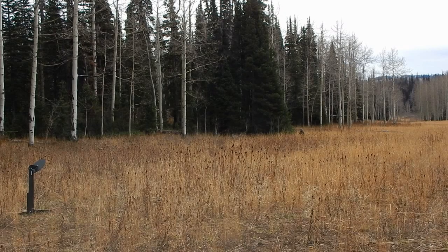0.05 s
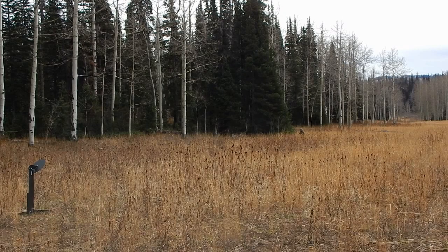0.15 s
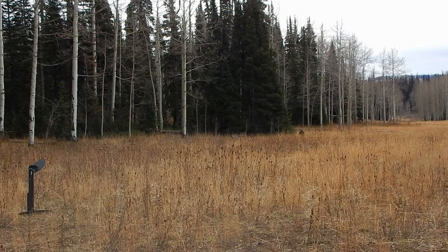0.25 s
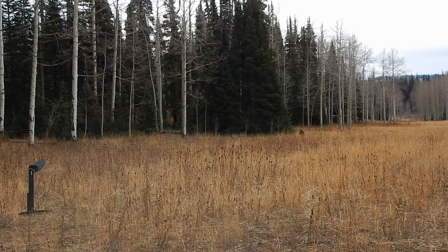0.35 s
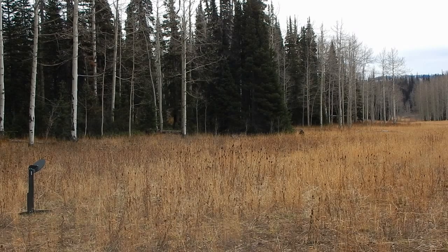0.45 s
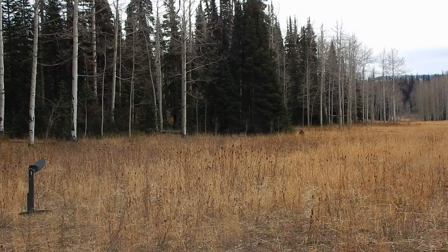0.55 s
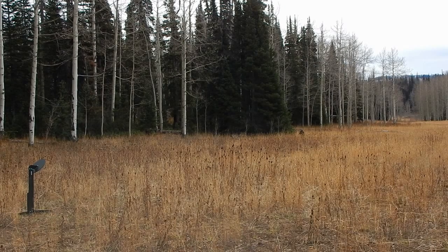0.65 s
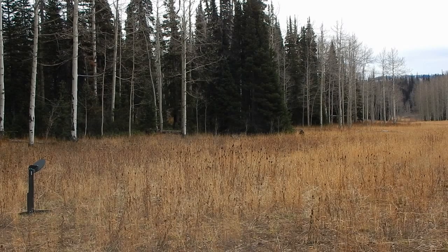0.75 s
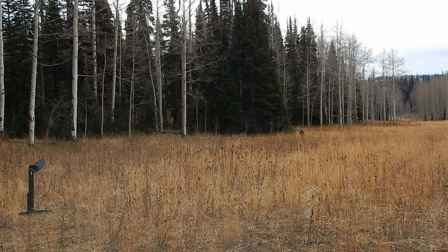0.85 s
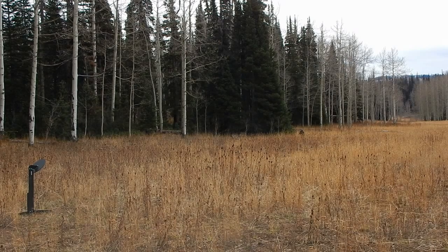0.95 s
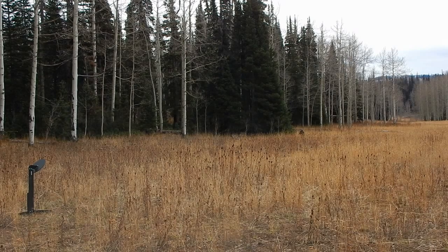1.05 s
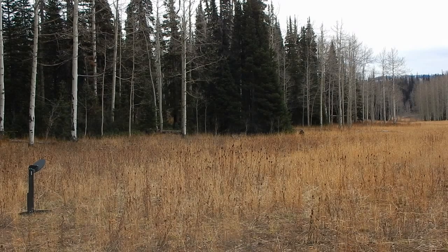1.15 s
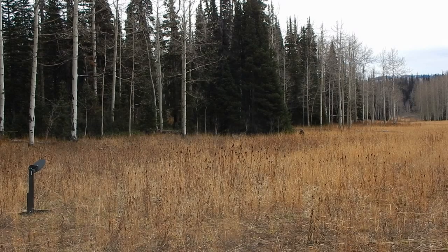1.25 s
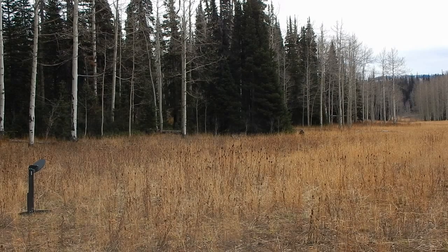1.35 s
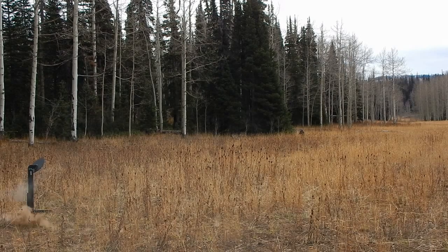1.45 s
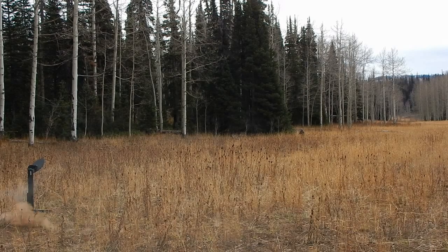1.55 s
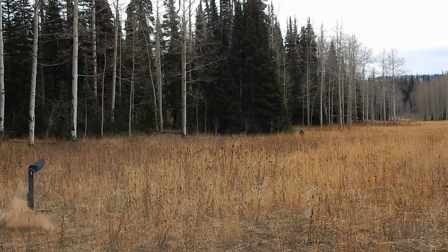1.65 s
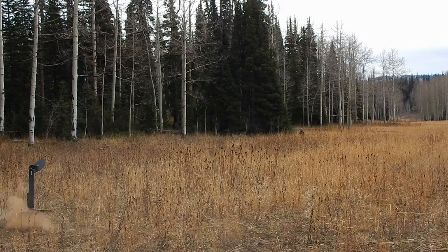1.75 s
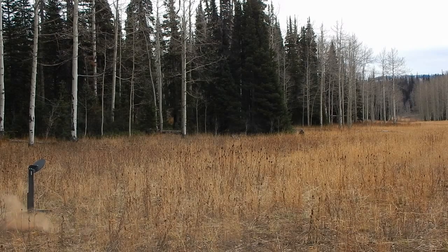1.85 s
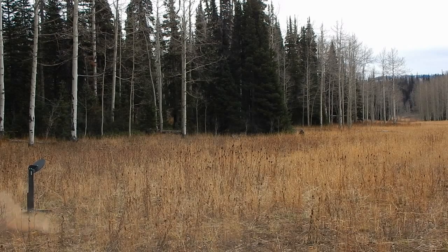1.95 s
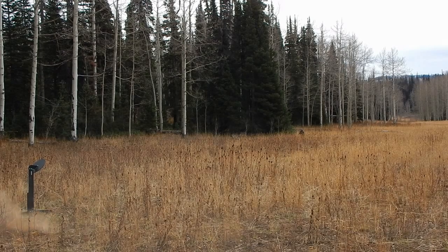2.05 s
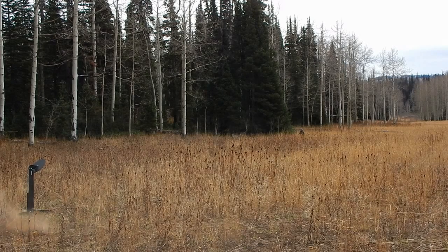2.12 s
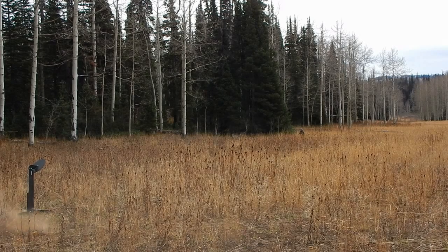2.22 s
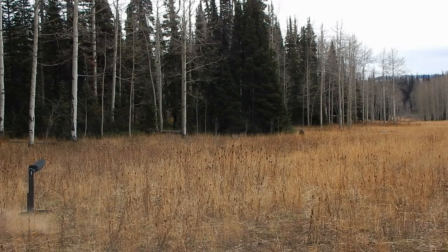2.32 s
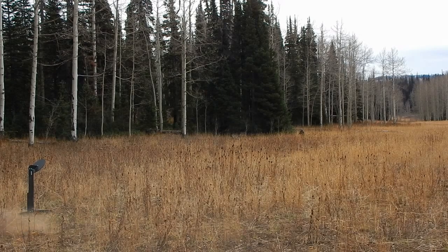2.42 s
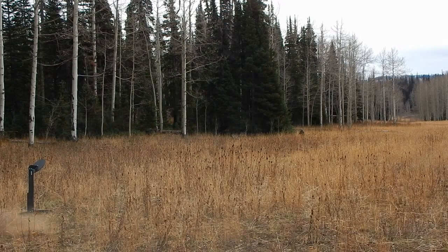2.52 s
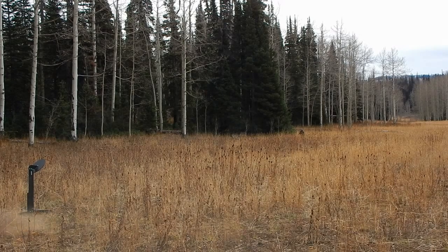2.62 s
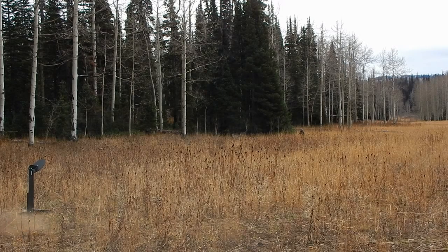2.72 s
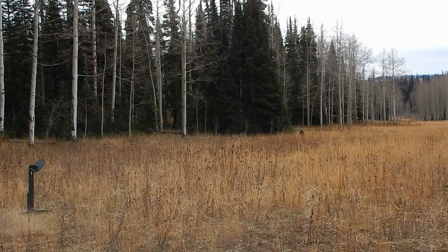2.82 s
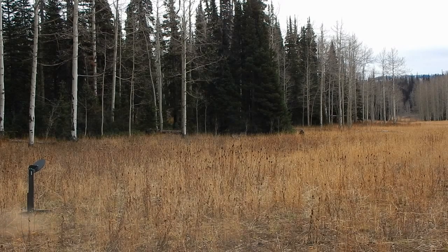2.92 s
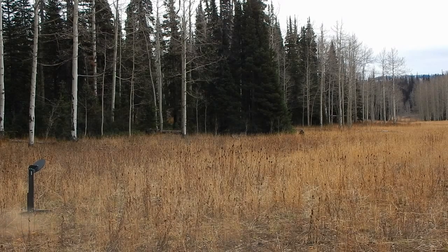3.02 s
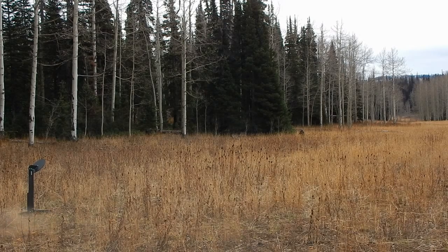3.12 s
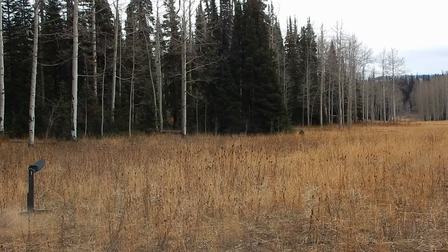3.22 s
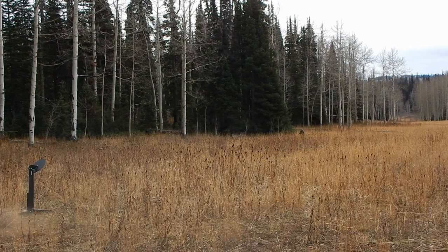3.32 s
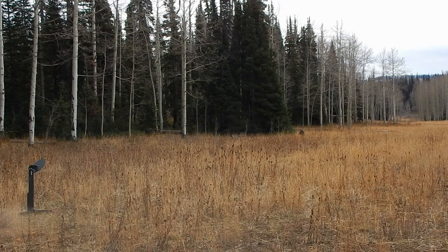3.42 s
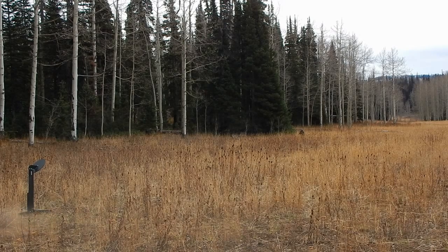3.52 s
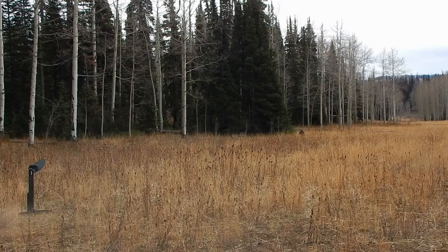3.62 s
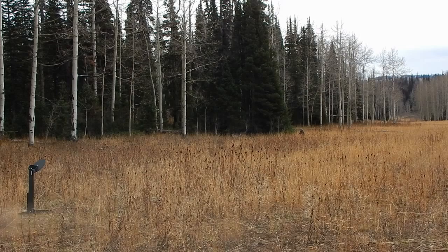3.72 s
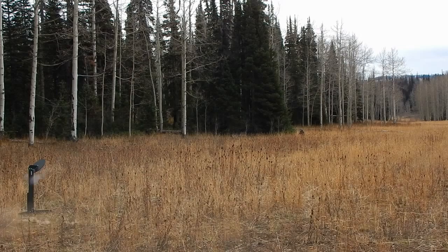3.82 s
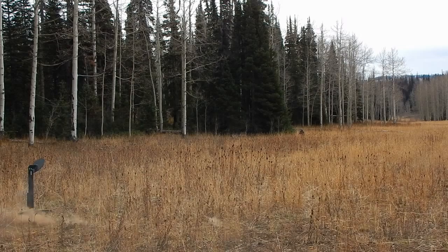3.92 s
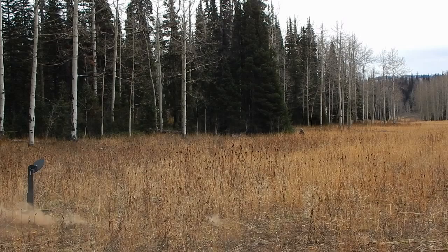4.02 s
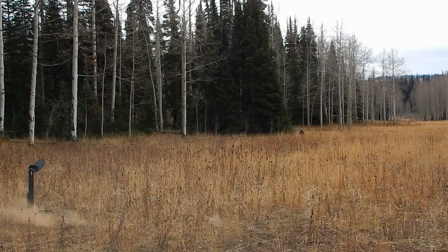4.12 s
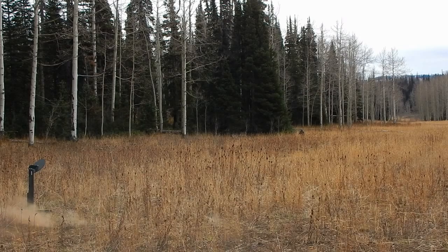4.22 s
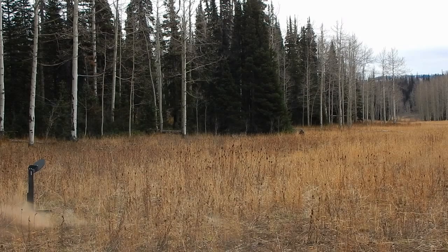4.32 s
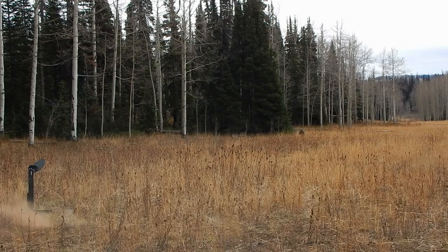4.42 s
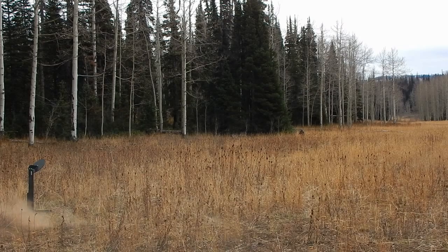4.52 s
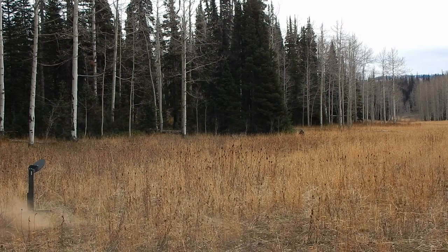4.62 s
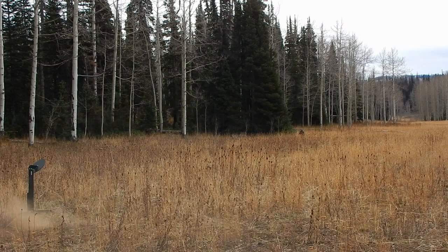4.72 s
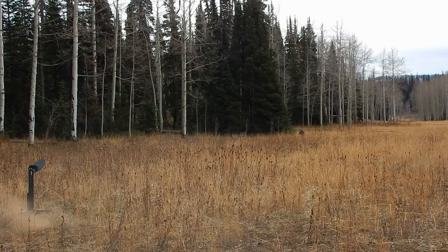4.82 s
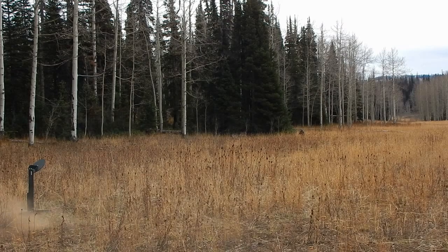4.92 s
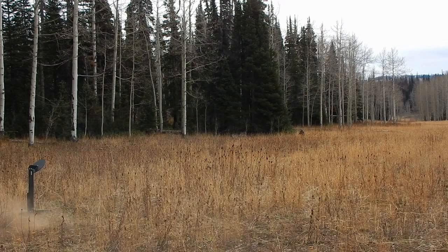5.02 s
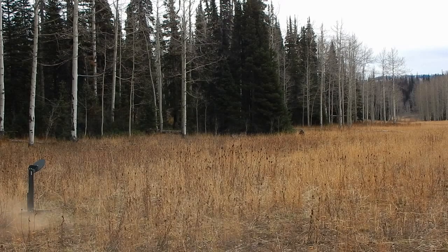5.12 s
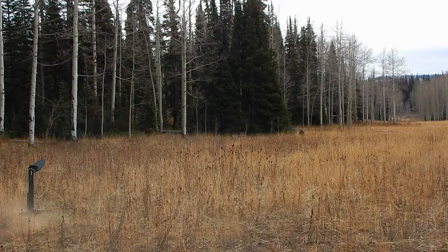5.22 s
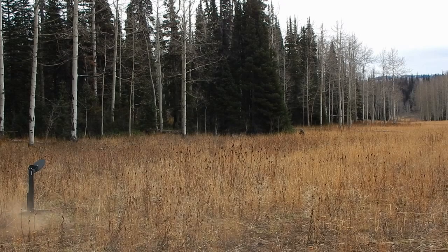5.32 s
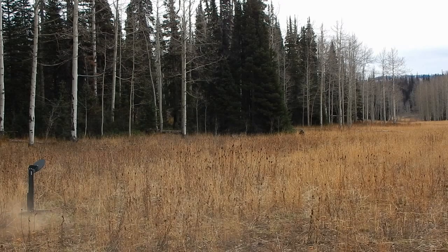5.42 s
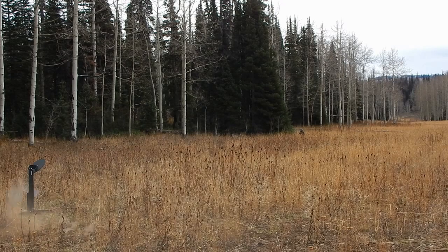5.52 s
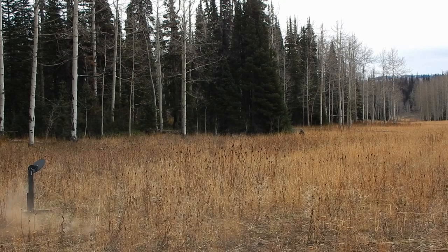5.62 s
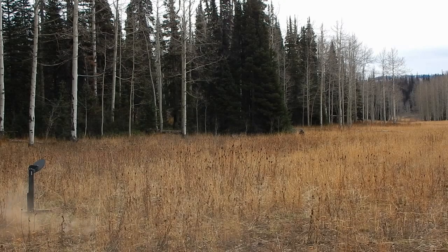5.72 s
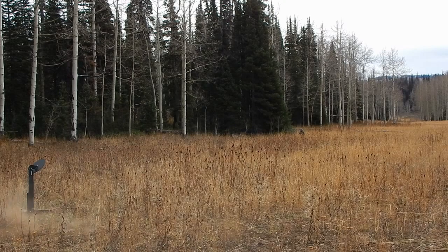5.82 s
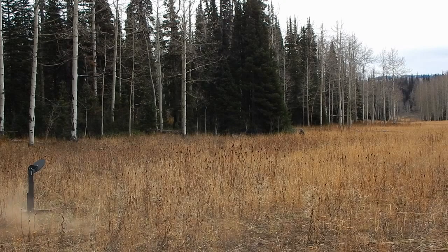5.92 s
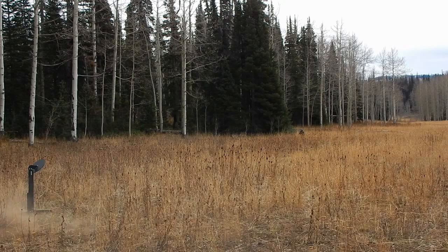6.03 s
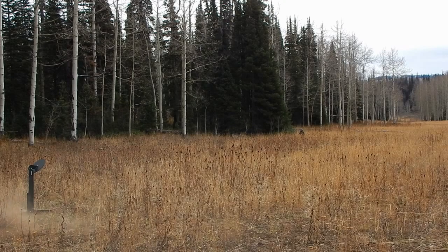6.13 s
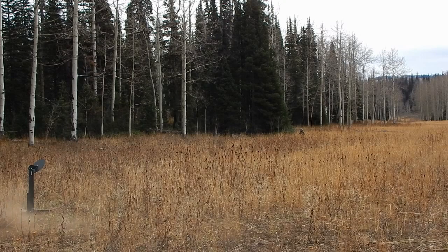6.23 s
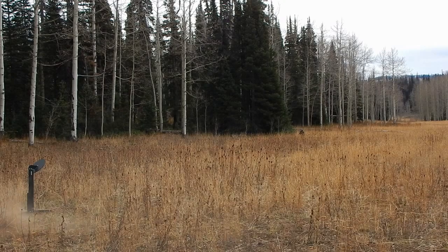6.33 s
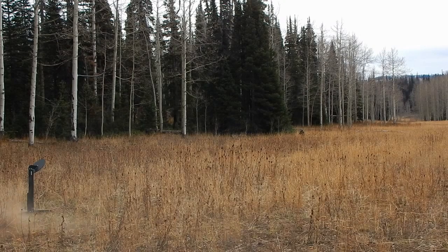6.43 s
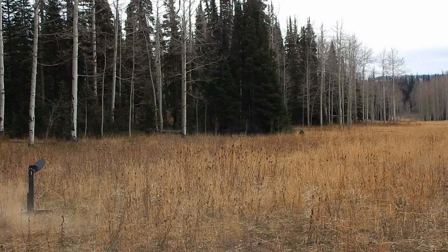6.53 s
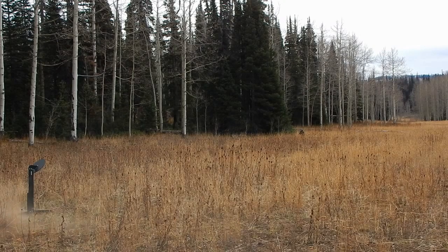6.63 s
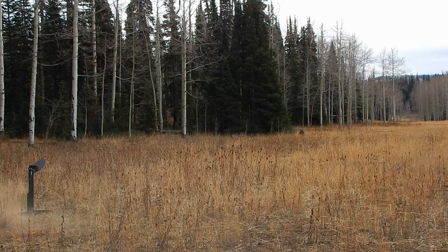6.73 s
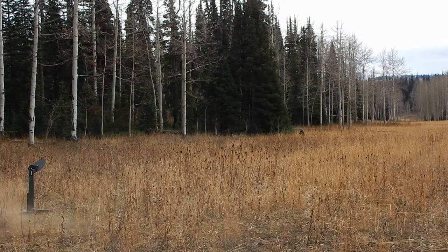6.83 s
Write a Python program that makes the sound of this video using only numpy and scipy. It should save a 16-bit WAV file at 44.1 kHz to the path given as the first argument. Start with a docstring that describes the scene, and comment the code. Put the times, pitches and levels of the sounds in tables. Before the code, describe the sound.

The dark valley roll of an earlier rifle shot is already fading at the start, over steady air and camera hiss. Small dull ticks sound close by around 0.7-1.0 s, then one hard bright click at 1.1 s. At 1.5 s a bullet cracks against a nearby steel plate: explosive snap, splash of lead, short metallic clang, and the muzzle blast about a twentieth of a second later. Grass and forest scatter a dense echo, then the valley rolls away. Faint ticks recur near 2.5-2.8 s and a soft low bump at 3.6 s. A second strike hits at 3.9 s, ringing clearly; more ticks come around 5.2-5.3 s. The third lands at 5.55 s, with a bright ring and strong report, its echo decaying to the end. The camera's gain drops at every bang and recovers slowly, peaks saturated.

```python
"""Rifle shots on a steel plate

Three rifle bullets strike a steel plate in a meadow, close to a camera; the rifle is farther off.
Each shot is a crack and splash of lead, the plate's ring, the late muzzle report, then echoes from grass,
forest and valley. Shaped noise makes splash, echoes and hiss; decaying tones make the ring.
An earlier shot is still rolling away. The camera's gain drops at every bang and creeps back up."""
import sys
import numpy as np
from scipy import signal
from scipy.fft import rfft, irfft
from scipy.io import wavfile
from scipy.ndimage import uniform_filter1d

SR = 44100
rng = np.random.default_rng(int(sys.argv[2]) if len(sys.argv) > 2 else 0)


def dump_mix(stems):
    """Bounce the given channels to the path in sys.argv[1] as a 16-bit WAV at rate SR."""
    frames = np.atleast_2d(stems).T  # one column per channel
    limited = np.clip(frames, -1, 1)  # hard clip at full scale
    pcm = np.round(limited * 32767).astype(np.int16)
    wavfile.write(sys.argv[1], SR, pcm)


N = 302526
T = np.arange(N) / SR
EARLIER_SHOT_S, EARLIER_SHOT_DB = -0.84, 1.5  # fired before the start; level of its valley roll


def amp(db):
    """Decibels to gain."""
    return 10 ** (np.asarray(db) / 20)


def read(points, hz):
    """Every column of a table at hz, joined on a log-frequency axis."""
    f, *columns = np.transpose(points)
    return [np.interp(np.log(hz + 1), np.log(f), column) for column in columns]


def add(mix, s, sound):
    """Mixes a sound in at time s."""
    part = mix[round(s * SR):][:len(sound)]
    part += sound[:len(part)]


def wander(rate_hz):
    """Smooth chance of rms 1, its spectrum fading out around the rate."""
    size = 2 ** 19
    spectrum = rfft(rng.standard_normal(size))
    low_pass = np.exp(-(np.fft.rfftfreq(size, 1 / SR) / rate_hz) ** 2)
    x = irfft(spectrum * low_pass)[:N]
    return x / x.std()


def noise(field_db, size=512):
    """Noise whose density in dB per Hz follows field_db(Hz, s)."""
    overlap = size * 3 // 4
    hz, t, z = signal.stft(rng.standard_normal(N), SR, nperseg=size, noverlap=overlap)
    shaped = z * amp(field_db(hz[:, None], t))
    return np.sqrt(SR / 2) * signal.istft(shaped, SR, nperseg=size, noverlap=overlap)[1][:N]


def dying(table, s, rise_s, size=512):
    """Noise that swells from time s and dies away, each band at its own speed."""
    def field_db(hz, t):
        db, t60 = read(table, hz)
        return db - 60 * np.maximum(t - s, 0) / t60
    return noise(field_db, size) * np.clip((T - s) / rise_s, 0, 1)


def push(db, length_s):
    """A blast wave: a sudden rise in pressure, then a weaker suction."""
    u = T[:SR // 10] / length_s
    return amp(db) * (1 - u) * np.exp(-u)


def hiss():
    """Steady noise of the air and the camera."""
    # Each row: frequency in Hz, density in dB per Hz.
    hiss_spectrum = [(30, -124), (150, -108), (600, -108), (2000, -121), (3500, -117), (4600, -123),
                     (5500, -114), (6300, -121), (6900, -132), (7500, -133), (8200, -123), (8700, -128),
                     (9200, -138), (16000, -141)]
    return noise(lambda hz, t: read(hiss_spectrum, hz)[0])


def valley(s, rise_s=0.13, lumps_db=.5):
    """The long dark roll from distant slopes, its highs dying soonest."""
    # Each row: frequency in Hz, starting density in dB per Hz ahead of the shot's level, t60 in seconds.
    slopes = [(30, -104, 5.1), (93.1, -77.5, 3.5), (194, -70.5, 3.73), (346, -74, 3.68), (536, -63, 3.39),
              (880, -69, 3.38), (2000, -65.5, 2.53), (2770, -68, 1.923), (3580, -64.5, 1.79),
              (3680, -71.5, 1.41), (4470, -68, 1.42), (6570, -83.5, 1.43), (16000, -140, 0.72)]
    return dying(slopes, s, rise_s, size=2048) * amp(lumps_db * wander(30))


def snap(db, ring_s, tail_db, tail_s, top_hz):
    """One dry click: a coloured burst with a weak tail; a softer contact has a lower top."""
    # Colour of a tick close to the microphone. Each row: frequency in Hz, relative level in dB.
    tick_colour = [(200, -37.5), (1200, -17.5), (2200, -4.5), (3400, -7.5), (4300, -1), (5600, 7.5),
                   (7000, -9), (8300, -3.5), (10000, -25.5), (16000, -28)]
    t = T[:2048]
    fade = np.exp(-t / ring_s) + amp(tail_db) * np.exp(-t / tail_s)
    hz = np.linspace(0, SR / 2, 129)
    gain = amp(read(tick_colour, hz)[0]) / np.sqrt(1 + (hz / top_hz) ** 6)
    colour = signal.firwin2(65, hz, gain, fs=SR)
    burst = np.convolve(fade * rng.standard_normal(len(t)), colour)
    # the colour leaves the energy to the level and the fade
    return amp(db) * burst * np.linalg.norm(fade) / np.linalg.norm(burst)


def ticks(faint_db=-74, spread_db=4, count=60, click_s=1.1038, click_db=-28):
    """Dull dry ticks close by, fainter ones at random between them, and one hard, brighter click."""
    # The clearest ticks near the camera. Each row: start in seconds, level in dB.
    clear = [(0.674, -48), (0.813, -64), (1.014, -65), (1.4243, -60.5), (2.526, -54), (2.686, -58),
             (2.787, -56.5), (5.232, -60.5), (5.335, -67.5)]
    out = np.zeros(N)
    faint = [(s * T[-1], faint_db + spread_db * (2 * u - 1)) for s, u in rng.random((count, 2))]
    for s, db in clear + faint:
        add(out, s, snap(db, ring_s=0.0015, tail_db=-15, tail_s=0.0099, top_hz=5800))
    # loud enough to duck the camera's gain
    add(out, click_s, snap(click_db, ring_s=.0013, tail_db=-37.5, tail_s=.008, top_hz=11000))
    return out


def crack(s, shock_db=8, length_s=0.00029, ground=0.22, ground_s=0.00088,
          thud_db=-13, thud_hz=190, thud_s=0.0057):
    """The bullet's N-shaped shock wave, its bounce off the ground, and the thud and splash of lead on steel."""
    # Each row: frequency in Hz, starting density in dB per Hz ahead of the shot's level, t60 in seconds.
    splash = [(60, -37.5, 0.027), (200, -35, 0.043), (600, -36.5, 0.038), (1500, -42, 0.048),
              (3580, -34.5, 0.026), (5970, -27, 0.015), (8200, -43.5, 0.018), (9700, -61.5, 0.051),
              (16000, -78.5, 0.028)]
    out = dying(splash, s, 0.00043, size=128)
    t = T[:SR // 10]
    u = 2 * t / length_s - 1  # -1 to 1 along the N
    shock = -amp(shock_db) * u * (u < 1)
    thud = amp(thud_db) * np.cos(2 * np.pi * thud_hz * t) * np.exp(-t / thud_s)
    thud += push(db=-13.5, length_s=0.0021)
    add(out, s, shock + thud)
    add(out, s + ground_s, ground * shock)
    return out


def plate(s, hit, echo_db=-16, echo_t60=1.83, air_hz=4200, flutter_hz=7, build_s=0.042):
    """Free modes of the plate; echoes of the ring build up and beat with each mode."""
    # The spot that is hit sets the modes' shares. Each row: frequency in Hz, t60 in seconds,
    # rms level in dB at the first hit, second, third, ahead of the shot's own plate level.
    modes = [(888.7, 7.5, -57.5, -65, -43), (1460.5, .55, -25, -42, -38), (1502, .9, -48, -33, -40),
             (1583, .9, -50, -48, -36), (1643.5, .33, -16, -38, -44), (1938, .5, -31, -46, -40),
             (2292, 1.02, -26, -19.5, -20), (3228.3, 1, -24, -20, -12), (3386, .45, -29, -43, -29),
             (3502.5, .3, -26, -35, -26), (4080, .12, -19, -35, -27), (4302, .85, -42, -31, -31.5),
             (5232.5, .21, -14, -19, -38), (5509.5, .68, -39, -23, -19.5), (6077, .2, -20, -39, -33),
             (6374, .2, -32, -39, -32), (6826, 1.1, -58, -43, -36), (6908, 1.8, -57, -47, -41),
             (8125, .58, -47, -60, -40), (8270, .8, -60, -48, -45), (9803, .48, -68, -68, -55),
             (11455, .42, -70, -61, -59)]
    out = np.zeros(N)
    waver = wander(flutter_hz) + 1j * wander(flutter_hz)
    for hz, t60, *levels_db in modes:
        age = T[:round(2 * max(t60, 1) * SR)]
        linger_s = max(t60, echo_t60 / (1 + (hz / air_hz) ** 4))  # air soaks up the high echoes
        own_waver = np.roll(waver, rng.integers(N))[:len(age)]
        echoes = np.minimum(age / build_s, 1) * own_waver
        echoes *= np.sqrt(min(t60, 1)) * amp(echo_db - 60 * age / linger_s)
        turn = np.exp(2j * np.pi * (hz * age + rng.random()))
        ring = ((amp(-60 * age / t60) + echoes) * turn).real
        add(out, s, np.sqrt(2) * amp(levels_db[hit]) * ring)
    return out


def meadow(s):
    """The grass around the plate scatters the crack back as a short wash of noise."""
    # Each row: frequency in Hz, starting density in dB per Hz ahead of the shot's level, t60 in seconds.
    grass = [(60, -75.5, .2), (300, -64, 0.77), (1000, -61, 0.45), (2020, -54.5, 0.6), (3670, -51, 0.34),
             (5590, -47, 0.26), (7840, -62.5, 0.19), (9500, -79.5, 0.14), (16000, -79.5, .16)]
    return dying(grass, s, 0.0054)


def report(swing_hz=105, swing_db=-7, swing_s=0.0058, snap_db=-2, snap_s=0.0019, snap_hz=3200, fizz=0.03):
    """The muzzle blast: a push and suction, a sharp snap, and a brief low swing."""
    t = T[:SR // 10]
    swing = amp(swing_db) * np.cos(2 * np.pi * swing_hz * t) * np.exp(-t / swing_s)
    white = rng.standard_normal(len(t))
    burst = signal.lfilter(*signal.butter(2, snap_hz, fs=SR), white) + fizz * white
    sharp_snap = amp(snap_db) * burst / burst.std() * np.exp(-t / snap_s)
    return push(db=-10.5, length_s=0.0021) + swing + sharp_snap


def forest(s, delay_s=0.08, rise_s=0.0059, trunks_db=1.0, clumps_db=1.2):
    """The forest edge returns the bang as a crowd of echoes from trunks and stands of trees."""
    # Each row: frequency in Hz, starting density in dB per Hz ahead of the shot's level, t60 in seconds.
    trees = [(30, -91, .5), (89.5, -70, 0.86), (173.7, -53.5, 1), (345, -56.5, 0.93), (700, -54.5, 1),
             (1880, -48.5, 0.5), (3020, -60, 0.87), (3490, -47.5, 0.63), (3630, -64.5, 0.69),
             (4640, -59, 0.4), (5620, -57.5, 0.75), (6680, -70, 0.17), (8000, -76, 0.48), (9200, -94, .4),
             (16000, -108, 0.29)]
    unevenness_db = trunks_db * wander(560) + clumps_db * wander(30)
    return dying(trees, s + delay_s, rise_s) * amp(unevenness_db)


def bump(s=3.565, bump_db=-66.5, rise_s=0.018, bump_decay_s=0.044,
         rumble_db=-77.5, rumble_decay_s=.45, low_hz=46, high_hz=88):
    """A soft low bump of band-limited noise that dies quickly into a faint rumble."""
    band = signal.butter(3, [low_hz, high_hz], "band", fs=SR, output="sos")
    rumble = signal.sosfilt(band, rng.standard_normal(N))
    age = np.maximum(T - s, 0)
    fade = amp(bump_db) * np.exp(-age / bump_decay_s) + amp(rumble_db) * np.exp(-age / rumble_decay_s)
    return np.minimum(age / rise_s, 1) * fade * rumble / rumble.std()


def scene(report_lag_s=.0558):
    """The bullet outruns its muzzle report; grass, forest and valley answer in turn."""
    # Each row: strike in seconds, then levels in dB of the crack (with the grass), plate,
    # muzzle report, forest echo and valley roll.
    shots = [(1.47, -0.5, -1.5, -2, -2, 2.5), (3.9193, -0.5, 1, -0.5, -1.5, 2.5),
             (5.554, 0, 1.5, 2, -1, 3.5)]
    out = hiss() + bump() + ticks() + amp(EARLIER_SHOT_DB) * valley(EARLIER_SHOT_S)
    for hit, (s, crack_db, plate_db, report_db, forest_db, valley_db) in enumerate(shots):
        out += amp(crack_db) * (crack(s) + meadow(s))
        out += amp(plate_db) * plate(s, hit)
        add(out, s + report_lag_s, amp(report_db) * report())
        out += amp(forest_db) * forest(s)
        out += amp(valley_db) * valley(s)
    return out[None]


def input_tone(x, shelf_db=6, dip_db=6, size=883):
    """The camera lowers the bass and a band just under 4 kHz; the symmetric filter rings a little early."""
    hz = np.linspace(0, SR / 2, 8193)
    bass, band = hz < 165, abs(hz - 3900) < 110
    gain = amp(-shelf_db * bass - dip_db * band)
    taps = signal.firwin2(size, hz, gain, fs=SR, window=("tukey", .8))
    return signal.oaconvolve(x, taps, "same")


def notches(x):
    """The camera's narrow notch filters, each subtracting most of a resonant peak's band."""
    # Each row: centre in Hz, width in Hz, depth in dB.
    narrow_cuts = [(2505, 330, 28), (5000, 70, 19), (6000, 70, 19), (7000, 55, 14), (8000, 45, 10),
                   (9000, 60, 10)]
    for hz, width, depth_db in narrow_cuts:
        peak = signal.lfilter(*signal.iirpeak(hz, hz / width, fs=SR), x)
        x = x - (1 - amp(-depth_db)) * peak
    return x


def record(dry, boost_db=30, target_db=-10, recovery_db_per_s=16, ceiling=1.7, edge_hz=16000):
    """Gain control lifts quiet sound, drops at once on a loud one and recovers slowly; peaks saturate."""
    x = input_tone(dry[0])
    power = uniform_filter1d(x ** 2, 48)  # mean over about a millisecond
    level_db = 10 * np.log10(abs(power) + 1e-14)
    cut_db = np.clip(level_db + boost_db - target_db, 0, boost_db)
    cut_db[0] = boost_db + recovery_db_per_s * EARLIER_SHOT_S  # still recovering from the earlier shot
    # each cut is held and let go at a steady rate in dB
    recovered_db = recovery_db_per_s * T
    held_db = np.maximum.accumulate(cut_db + recovered_db) - recovered_db
    loud = ceiling * np.tanh(x * amp(boost_db - held_db) / ceiling)
    loud = np.clip(notches(loud), -.93, .93)
    # the camera's upper band edge
    low_pass = signal.firwin(511, edge_hz, window=("kaiser", 9), fs=SR)
    padded = np.pad(loud, len(low_pass) // 2, "reflect", reflect_type="odd")
    return signal.oaconvolve(padded, low_pass, "valid")[None]


dry = scene()
out = record(dry)
dump_mix(out)
```